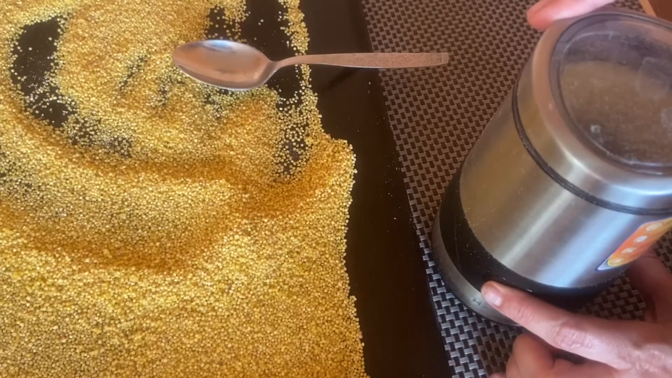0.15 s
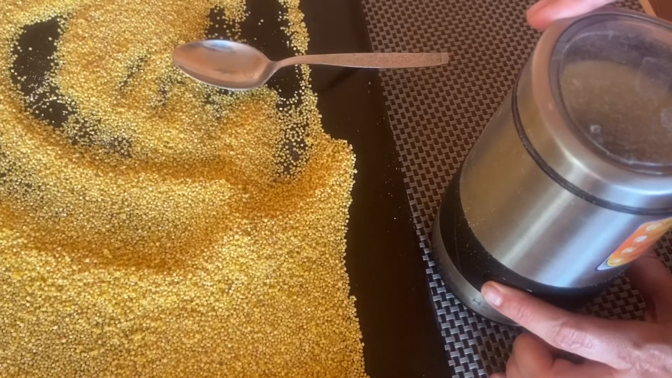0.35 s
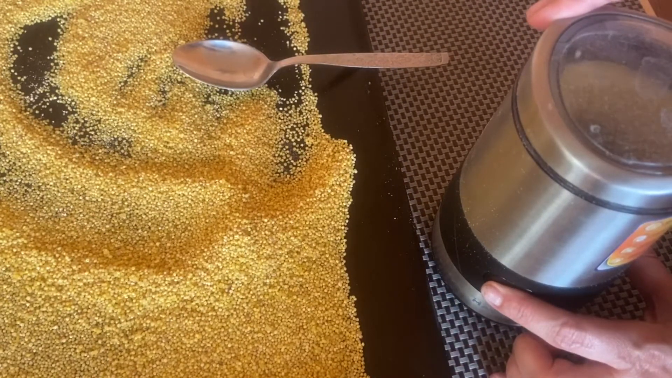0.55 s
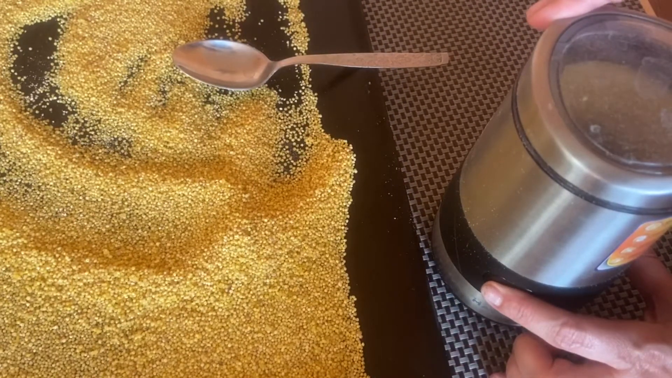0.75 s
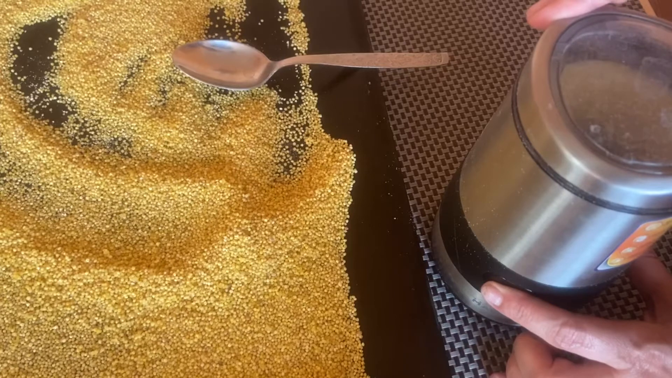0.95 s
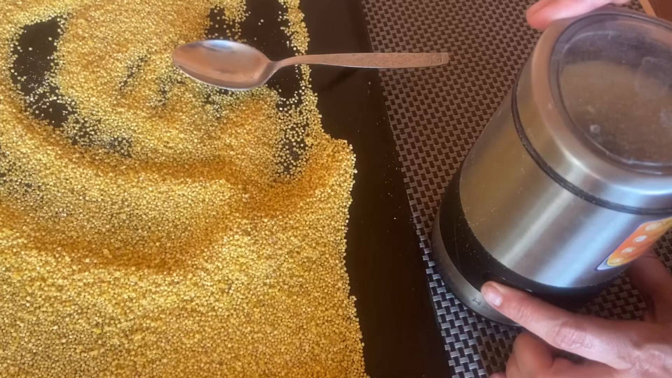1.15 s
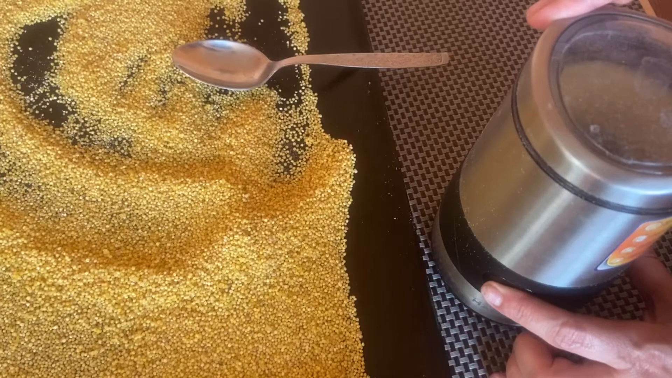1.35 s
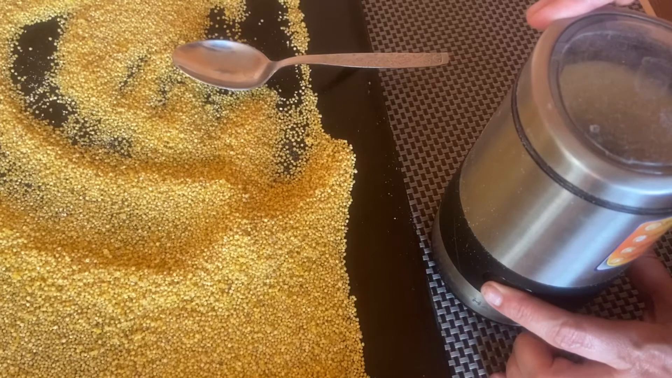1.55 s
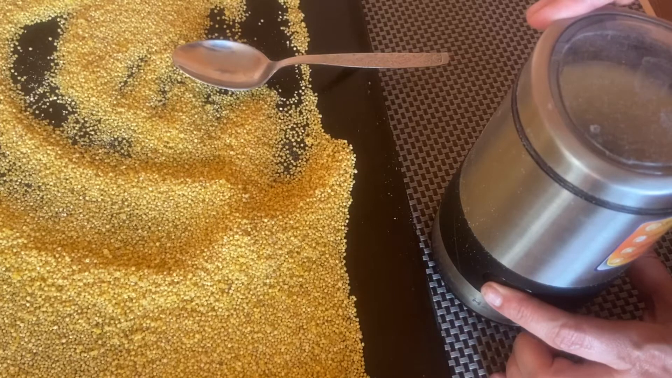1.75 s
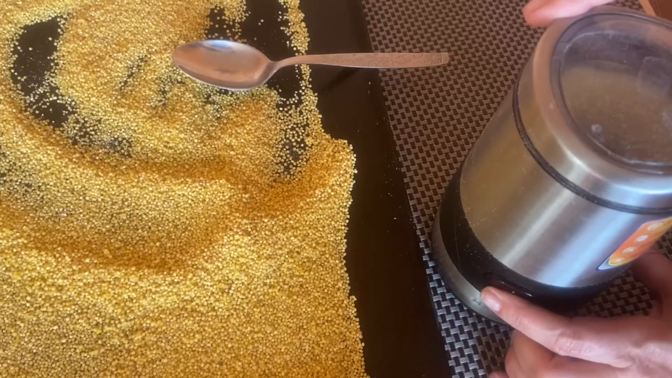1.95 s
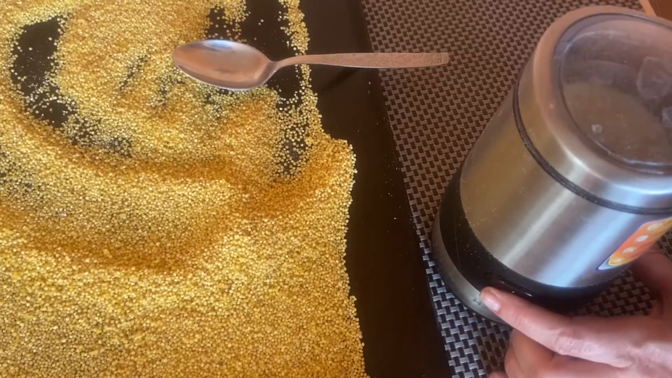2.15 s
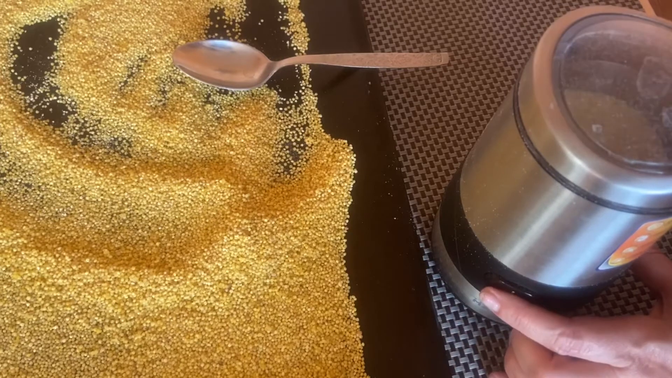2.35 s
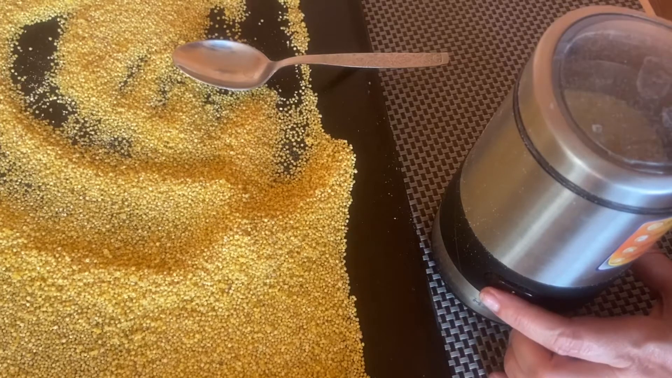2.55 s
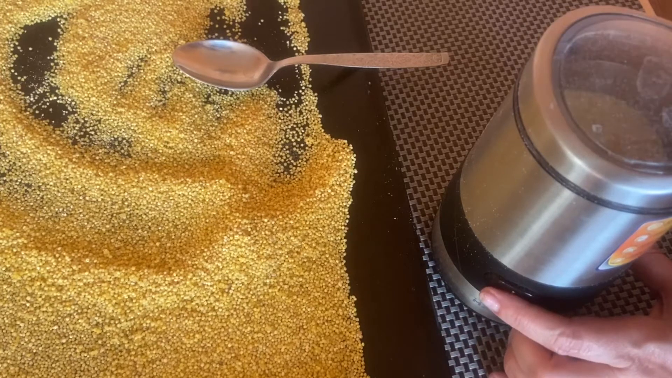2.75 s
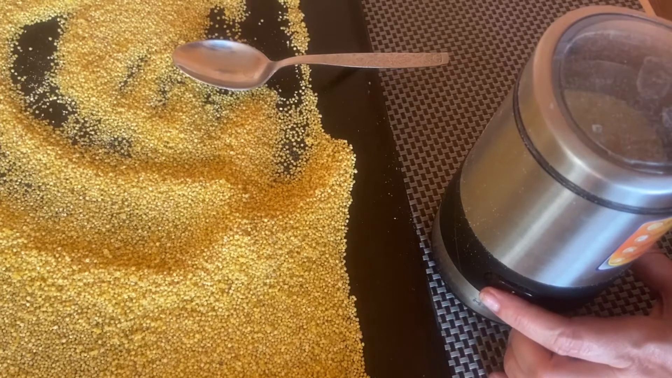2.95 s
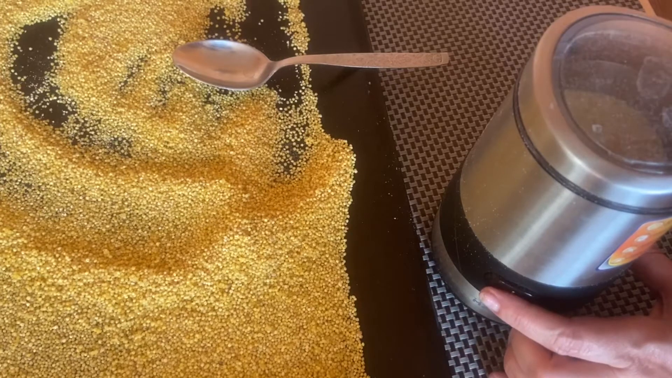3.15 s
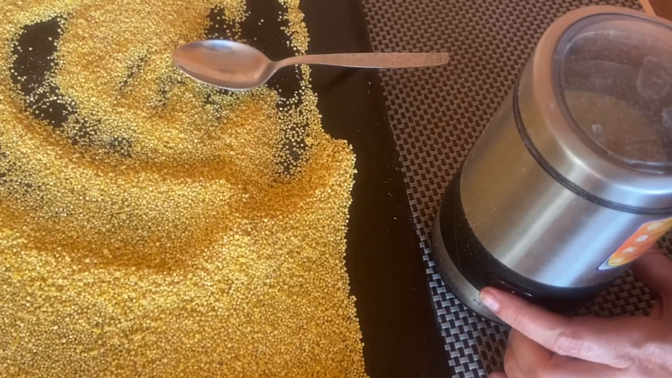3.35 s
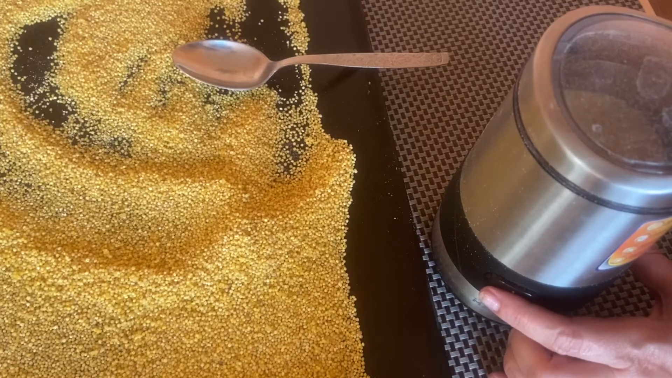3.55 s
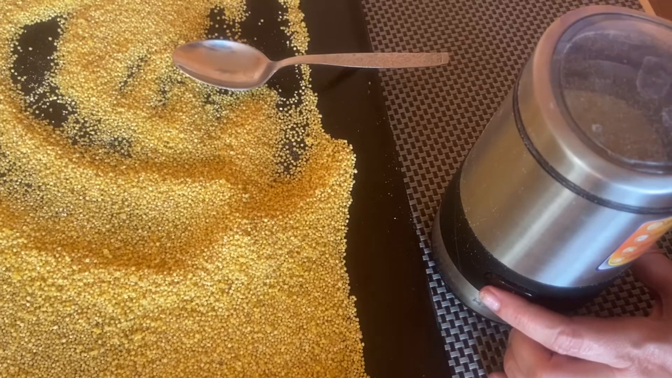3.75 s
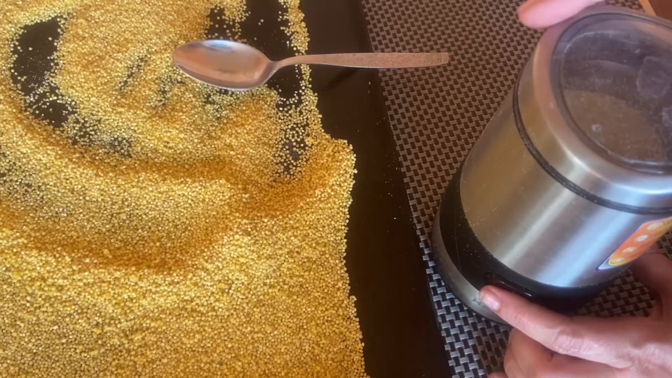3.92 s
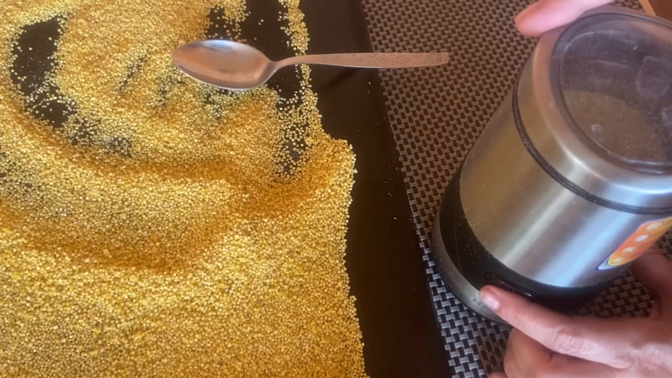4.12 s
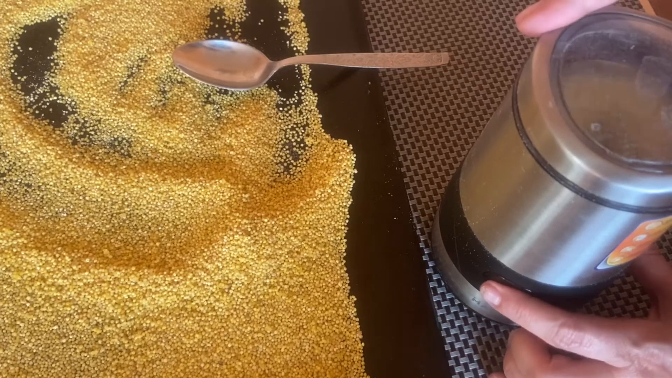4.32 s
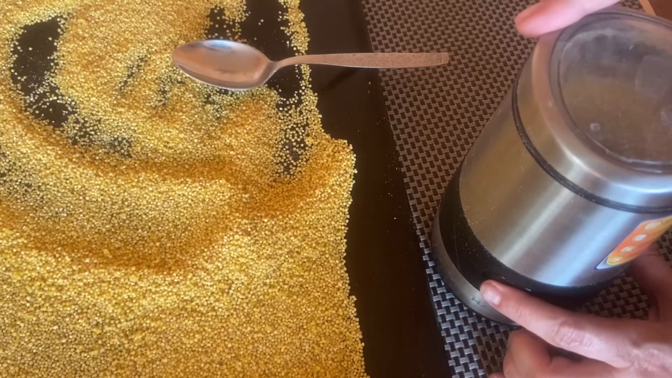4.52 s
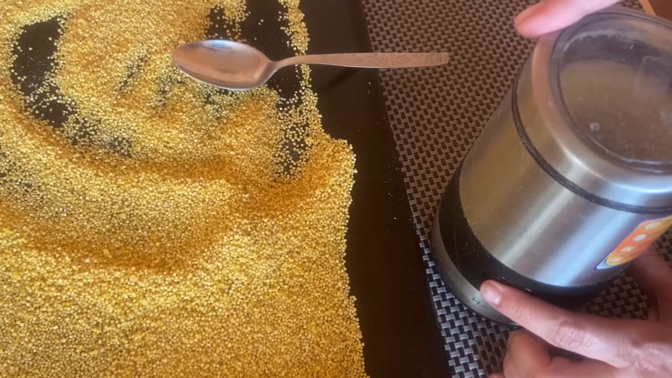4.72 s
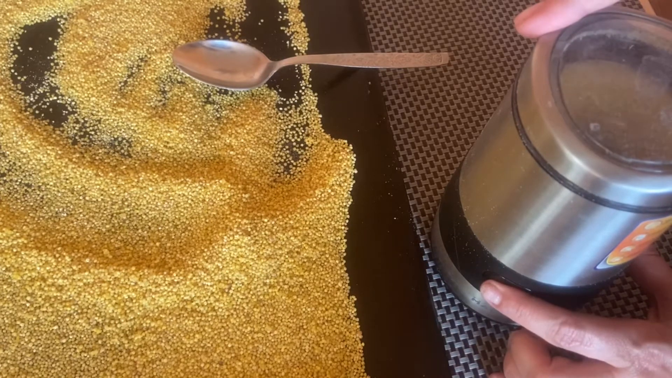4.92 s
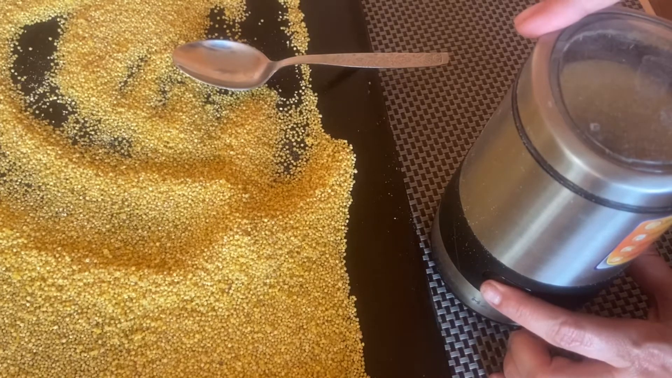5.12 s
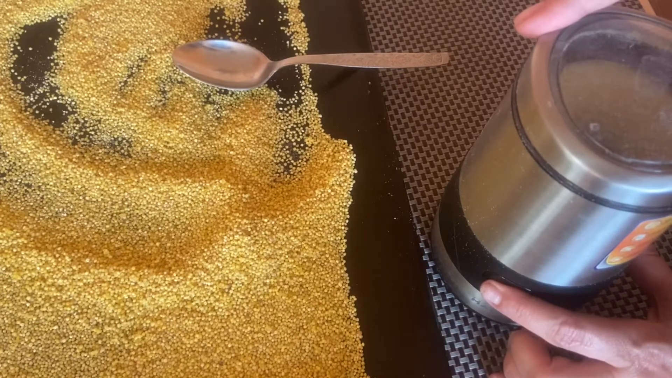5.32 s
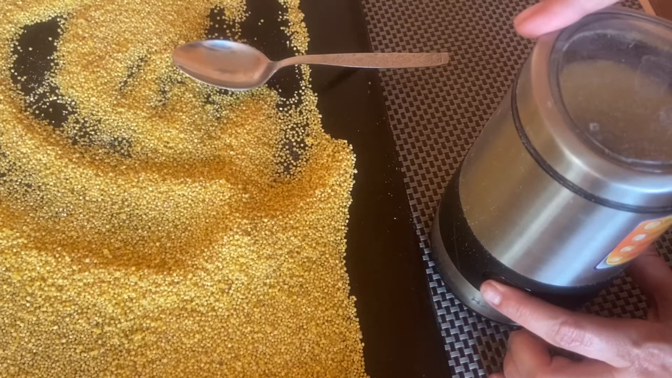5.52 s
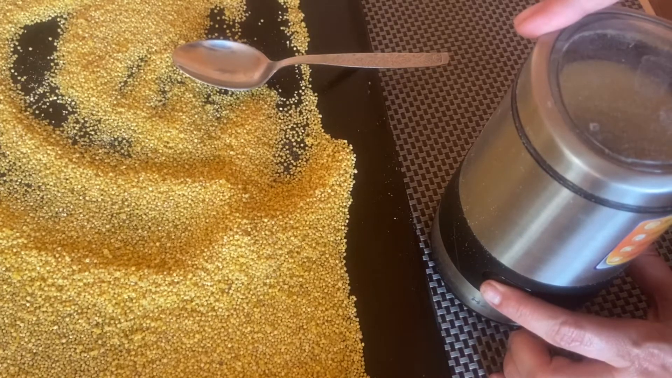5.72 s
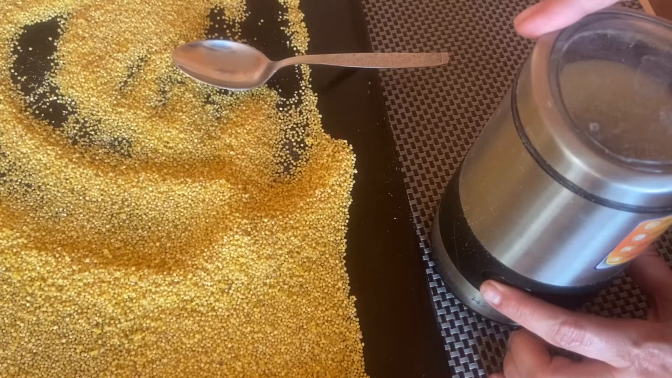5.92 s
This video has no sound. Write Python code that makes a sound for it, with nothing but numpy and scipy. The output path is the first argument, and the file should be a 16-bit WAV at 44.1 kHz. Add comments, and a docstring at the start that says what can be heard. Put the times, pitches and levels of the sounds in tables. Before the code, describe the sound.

An electric blade grinder roars with rattling grain, winds down to a quiet kitchen hum, then clicks and bursts back to full speed.

```python
"""Blade grinder on a kitchen table

An electric grinder coasts to a stop, rests about two seconds and starts again.
The shaft hums by sines that follow its speed; kernels patter as random hits through resonances of cup and lid.
The kitchen rings on after the blade stops, by sparse echo taps that die band by band.
In the pause: filtered noise as the low drone of the room, a finger on the button as struck modes,
and a faint thin whistle."""
import sys
import numpy as np
from scipy import signal
from scipy.fft import rfft, irfft, next_fast_len
from scipy.io import wavfile
from scipy.ndimage import uniform_filter1d

SR = 44100
rng = np.random.default_rng(int(sys.argv[2]) if len(sys.argv) > 2 else 0)


def waveform_to_disk(signal):
    """Save audio, clipped to [-1, 1], as 16-bit WAV at the path in sys.argv[1]."""
    frames = np.transpose(np.atleast_2d(signal))
    scaled = np.clip(frames, -1, 1) * 32767
    samples = np.round(scaled).astype(np.int16)
    wavfile.write(sys.argv[1], SR, samples)


def convert_level_to_amplitude(level_db):
    """Map a level in decibels to its linear amplitude factor."""
    exponent = np.asarray(level_db, float) / 20
    return 10 ** exponent


N = 263444
FULL_SPEED_HZ = 244  # reference shaft speed, turns per s


def evened(x):
    """Scales to rms 1."""
    return x / np.sqrt(np.mean(x ** 2) + 1e-20)


def read(points, hz):
    """Reads a table on a log-frequency axis."""
    f, value = np.transpose(points)
    return np.interp(np.log(hz + 1), np.log(f + 1), value)


def curve(tables, column, rest):
    """Joins one column of the bursts along the whole time, with a resting value between them."""
    t = np.arange(N) / SR
    out = np.full(N, float(rest))
    for rows in tables:
        rows = np.array(rows)
        inside = (t >= rows[0, 0]) & (t <= rows[-1, 0])
        out[inside] = np.interp(t[inside], rows[:, 0], rows[:, column])
    return out


def coloured(x, gain):
    """Filters by a function of frequency."""
    size = next_fast_len(N)
    spectrum = rfft(x, size) * gain(np.fft.rfftfreq(size, 1 / SR))
    return irfft(spectrum, size)[..., :N]


def ring(x, hz, width_hz):
    """A two-pole resonance of gain 1 at its centre."""
    return signal.lfilter(*signal.iirpeak(hz, hz / width_hz, SR), x)


def paired(shared, own, likeness):
    """Left port is the shared part; right mixes it with a part of its own, by likeness per frequency."""
    same = lambda hz: np.clip(read(likeness, hz), 0, 1)
    right = coloured(shared, same) + coloured(own, lambda hz: np.sqrt(1 - same(hz) ** 2))
    return np.array([shared, right])


def drift(cutoff_hz, shape):
    """Random wander: low-passed noise of rms 1."""
    return evened(signal.lfilter(*signal.butter(1, cutoff_hz, fs=SR), rng.standard_normal(shape)))


def kernels(per_s, spread_db):
    """Two trains of random hits at the same moments; a wider spread makes a few of them large."""
    hits = rng.random(N) < per_s / SR
    size = convert_level_to_amplitude(spread_db * np.minimum(rng.exponential(1, N), 5)) * hits
    return evened(size * rng.standard_normal((2, N)))


# Presses of the button. Each row: power on in seconds, power off in seconds, top speed in turns per s.
BURSTS = [(-.6, 1.812, 244.4), (4.33, 7, 245)]
# Shaft hum at top speed. Each entry: one burst's rms in dB, before drift, speed and port gains.
HUM_TOP_DB = [-31, -29.5]


def motor():
    """Shaft speed (turns per s), seconds since power off, hum level (dB); fast then slow rise, linear coast."""
    quick_share, quick_s, settle_s = .76, .088, .19  # the slow rest of the rise works against the load
    coast_hz_per_s = 730
    t = np.arange(N) / SR
    row = np.searchsorted([on for on, _, _ in BURSTS], t) - 1
    on_s, off_s, top_hz = np.transpose(BURSTS)[:, row]
    coast_s = np.maximum(t - off_s, 0)
    driven_s = np.minimum(t, off_s) - on_s
    quick = quick_share * np.tanh(driven_s / quick_s)
    slow = (1 - quick_share) * (1 - np.exp(-driven_s / settle_s))
    speed_hz = top_hz * (quick + slow) - coast_hz_per_s * coast_s
    return np.maximum(speed_hz, 0), coast_s, np.array(HUM_TOP_DB)[row]


# Kernel patter, one table a burst. Each row: time in seconds, level in dB before the patter gain.
PATTER_LEVEL = [
    [(0, -19.5), (1.7, -22), (1.95, -23.5), (2.07, -28.5), (2.1, -41)],
    [(4.341, -32.5), (4.353, -24), (4.485, -23.5), (4.513, -18), (4.721, -20), (5.97, -19.5)],
]
# Modes of housing, cup and lid. Each row: Hz, width in Hz, relative level in dB.
CUP_MODES = [(491.4, 20, -8.5), (450, 40, -19.5), (637.4, 25, -16.5), (689.8, 19, -9.5), (1333, 63, -7.5),
             (1458, 25, -8.5), (1555, 50, -8.5), (1723, 63, -7.5), (1846, 120, -8), (1999, 56, -10),
             (2159, 42, -11), (2470, 250, -13.5), (3112, 110, -13.5), (3713, 290, -10.5), (4087, 100, -7.5),
             (4840, 210, -10), (5200, 750, -7.5), (6330, 510, -6.5), (6964, 280, -7.5), (7380, 300, -11),
             (8140, 200, 0), (10180, 97, -11), (10470, 620, -5), (11200, 530, -7)]
# Colour change of a slow blade under power. Each row: Hz, change in dB at standstill.
STRAINING = [(480, -10), (700, 9), (1330, 8), (1600, 5), (3000, 1), (10000, -5)]
# Colour change of a slow blade while coasting. Each row: Hz, change in dB at standstill.
COASTING = [(480, -10), (700, 6), (1330, 3), (3000, 4), (4100, -4), (10000, -3)]
# Lid buzzing while the blade coasts. Each row: Hz, width in Hz, relative level in dB before slowness.
LOOSE_LID = [(1030, 90, -5), (1235, 80, -5), (880, 100, -9)]
# Housing buzzing while the motor pulls up. Each row: Hz, width in Hz, relative level in dB before slowness.
STRAIN_BUZZ = [(690, 18, 5), (1335, 22, 4)]
# Flour hissing round the wall. Each row: Hz, relative density in dB per Hz.
FLOUR_HISS = [(25, -37.5), (60, -13.5), (150, -15), (350, -16.5), (570, -10), (1000, -9.5), (1600, -9),
              (2800, -8), (4400, -11.5), (5500, -9.5), (6500, -3), (8500, -3), (10200, -7.5), (11000, -4),
              (11800, -8.5)]
# Likeness of the grinder at the two microphone ports. Each row: Hz, likeness 0 to 1.
GRINDER_LIKENESS = [(100, 0.99), (300, 1), (400, 0), (490, 1), (650, .55), (1000, 0.4), (1400, 1),
                    (1800, .93), (2500, 1), (2750, 0.89), (3050, 0.3), (3600, 1), (4500, 1), (5150, 0.6),
                    (5700, 0), (6100, 0.96), (7300, 1), (8000, 0.5), (8450, 1), (9600, 0.96), (10100, 0.3),
                    (10700, 1)]


def patter():
    """Kernels ring each mode of the cup in lumps; flour hisses; a slow blade changes the colour."""
    gain_db = 2.5
    speed_hz, coast_s, _ = motor()
    slow = np.clip(1 - speed_hz / FULL_SPEED_HZ, 0, 1)
    coasting = coast_s > 0
    out = np.zeros((2, N))
    for hz, width_hz, db in CUP_MODES:
        lumps_db = 2.2 * drift(7.1, N)
        slow_db = slow * np.where(coasting, read(COASTING, hz), read(STRAINING, hz))
        out += convert_level_to_amplitude(db + lumps_db + slow_db) * evened(ring(kernels(per_s=2500, spread_db=3), hz, width_hz))
    for hz, width_hz, db in LOOSE_LID:
        buzz = evened(ring(kernels(per_s=2100, spread_db=4.5), hz, width_hz))
        out += convert_level_to_amplitude(db) * np.sqrt(slow) * coasting * buzz
    for hz, width_hz, db in STRAIN_BUZZ:
        buzz = evened(ring(kernels(per_s=3500, spread_db=4), hz, width_hz))
        out += convert_level_to_amplitude(db) * slow ** .8 * (coast_s == 0) * buzz
    hiss = evened(coloured(kernels(per_s=14000, spread_db=0.0), lambda hz: convert_level_to_amplitude(read(FLOUR_HISS, hz))))
    out += convert_level_to_amplitude(8.0 + 2.0 * drift(25, N) - 1.5 * slow) * hiss
    sweep = 1 + 0.027 * np.cos(2 * np.pi * np.cumsum(speed_hz) / SR)  # the load circles with the blade
    level = uniform_filter1d(convert_level_to_amplitude(curve(PATTER_LEVEL, column=1, rest=-140)), size=60)
    shared, own = convert_level_to_amplitude(gain_db) * level * sweep * evened(out)
    return paired(shared, own, GRINDER_LIKENESS)


# Large lumps striking the cup. Each row: time in seconds, peak in dB.
KNOCKS = [(0.4001, -11.5), (2.073, -15), (4.345, -19), (4.3791, -10.5), (4.4398, -16), (4.5252, -10.5),
          (4.6987, -15), (4.9484, -12.5)]


def knocks():
    """Each lump rings all modes of the cup at once, each by a chance amount."""
    rise_s = .0006
    t = np.arange(2500) / SR
    out = np.zeros(N)
    shares = rng.standard_normal((len(KNOCKS), len(CUP_MODES)))
    for (start_s, peak_db), share in zip(KNOCKS, shares):
        blow = np.zeros(len(t))
        for k, (hz, width_hz, mode_db) in zip(share, CUP_MODES):
            decay = np.exp(-np.pi * width_hz * t)
            blow += k * convert_level_to_amplitude(mode_db) * np.sqrt(width_hz) * decay * np.sin(2 * np.pi * hz * t)
        blow = blow * np.minimum(t / rise_s, 1)
        out[round(start_s * SR):][:len(t)] += convert_level_to_amplitude(peak_db) * blow / abs(blow).max()
    return out


# Brief dips of the blade-pass tone. Each row: time in seconds, depth in dB, recovery time constant in s.
DIPS = [(.293, 17, .025), (.648, 14, 0.058), (.978, 23, 0.036), (1.19, 16, 0.01), (1.316, 22, .04),
        (1.645, 13, 0.022), (4.56, 17, 0.019), (4.655, 26, 0.015), (5.413, 34, 0.0052)]


def dips():
    """Depth in dB: each dip deepens exponentially and recovers at its own pace."""
    fall_s = 0.0092
    t = np.arange(N) / SR
    return sum(db * np.exp(-abs(t - s) / np.where(t < s, fall_s, back_s)) for s, db, back_s in DIPS)


# Hum against speed. Each row: turns per s, change in dB.
HUM_BY_SPEED = [(50, -34), (130, -22), (170, -22), (195, -8), (214, 1), (244, 0)]
# Blade-pass tone against speed. Each row: turns per s, change in dB.
BLADE_BY_SPEED = [(150, -35), (210, -14), (222, -4), (233, -10), (238, 0)]
# Blade-pass tone, one table a burst. Each row: time in seconds, rms in dB before speed, dips and port gains.
BLADE_LEVEL = [
    [(0, -24.5), (.43, -28.5), (.62, -26), (.95, -25.5), (1.05, -26.5), (1.5, -28), (2.1, -27.5)],
    [(4.34, -32), (4.75, -30.5), (4.95, -22.5), (5.0, -28), (5.34, -24.5), (5.43, -25.5), (5.66, -32),
     (5.89, -25), (5.97, -31.5)],
]
# Table top shaken by the shaft. Each row: Hz, width in Hz, gain in dB before port gains.
TABLE_MODES = [(136, 3, -24), (198, 12, -32)]


def shaft():
    """Unbalance hums once a turn, the two blade tips twice; the table rings as the speed passes its modes."""
    coast_hum_db_per_s, coast_blade_db_per_s = 91, 303  # fades once the power is off
    port_db = np.array([[-2.2], [1.2]])
    speed_hz, coast_s, hum_db = motor()
    wander_hz = 1.2 + 25 * (1 - speed_hz / FULL_SPEED_HZ) * (coast_s == 0)
    turns = np.cumsum(speed_hz + wander_hz * drift(27, N)) / SR
    hum_db = hum_db + read(HUM_BY_SPEED, speed_hz) - coast_hum_db_per_s * coast_s + .8 * drift(3.1, N)
    blade_db = curve(BLADE_LEVEL, column=1, rest=-140) + read(BLADE_BY_SPEED, speed_hz)
    blade_db = blade_db - coast_blade_db_per_s * coast_s - dips()
    once = np.sqrt(2) * convert_level_to_amplitude(hum_db) * (speed_hz > 0) * np.sin(2 * np.pi * turns)
    twice = np.sqrt(2) * convert_level_to_amplitude(blade_db) * np.sin(4 * np.pi * turns + 1.2)
    shake = speed_hz / FULL_SPEED_HZ * np.sin(2 * np.pi * turns)
    table = sum(convert_level_to_amplitude(db) * ring(ring(shake, hz, width_hz), hz, 6 * width_hz)
                for hz, width_hz, db in TABLE_MODES)
    return (once + twice + table) * convert_level_to_amplitude(port_db)


def struck(events, modes, hiss_db, rise_s):
    """Every blow rings the same modes, a little differently each time, under a puff of noise."""
    hiss_decay_s = .0035
    t = np.arange(6000) / SR
    out = np.zeros(N)
    shares = rng.standard_normal((len(events), len(modes)))
    puffs = rng.standard_normal((len(events), len(t)))
    puffs = signal.lfilter([1], [1, -.8], puffs)  # softens the treble
    for (start_s, db), share, puff in zip(events, shares, puffs):
        blow = convert_level_to_amplitude(hiss_db) * puff * np.exp(-t / hiss_decay_s)
        for k, (hz, mode_db, t60_s) in zip(share, modes):
            blow += convert_level_to_amplitude(mode_db + 2 * k - 60 * t / t60_s) * np.sin(2 * np.pi * hz * t)
        out[round(start_s * SR):][:len(t)] += convert_level_to_amplitude(db) * np.minimum(t / rise_s, 1) * blow
    return out


# Finger on the button. Each row: time in seconds, gain in dB.
TICKS = [(3.822, -70), (3.84, -70), (3.857, -64), (4.278, -48), (4.3395, -30)]
# Plastic of the button. Each row: Hz, mean relative level in dB, t60 in s.
BUTTON_MODES = [(920, -4, 0.032), (1800, 1.5, 0.026), (2570, -3, .01), (5200, -1, .01), (6830, -7, .01)]
# Base jolting on the table. Each row: time in seconds, gain in dB.
JOLTS = [(4.281, -53), (4.303, -47.5), (4.348, -25), (4.364, -28)]
# Base of the grinder. Each row: Hz, mean relative level in dB, t60 in s.
BASE_MODES = [(62, -17, .3), (112, -9, .3), (345, 0, .1), (505, -6, .08), (600, -1, .1)]


def button():
    """Short plastic ticks, and the thuds of the base as the finger presses and the motor kicks."""
    ticks = struck(TICKS, BUTTON_MODES, hiss_db=-15, rise_s=.001)
    thuds = struck(JOLTS, BASE_MODES, hiss_db=-40, rise_s=.004)
    return ticks + thuds


# Whistle. The one row: start in seconds, length in seconds, mean Hz, mean level in dB at the top of its swell.
WHISTLE = (3.9, .125, 3705, -74.5)


def whistle():
    """A faint sine, made fuzzy by wandering pitch and level, that swells and stops."""
    start_s, length_s, hz, db = WHISTLE
    arch = np.sin(np.pi * np.clip((np.arange(N) / SR - start_s) / length_s, 0, 1) ** 1.4)
    swell = np.sqrt(abs(arch)) * (arch > 1e-6)
    level = convert_level_to_amplitude(db + 3.5 * drift(60, N))
    cycles = np.cumsum(hz + 110 * drift(150, N)) / SR
    return swell * level * np.sin(2 * np.pi * cycles)


# Decay of the kitchen. Each row: Hz, t60 in s.
KITCHEN_T60 = [(200, 0.45), (1000, 0.62), (4000, 0.51), (8000, 0.4), (12000, 0.36)]
# Likeness of diffuse sound at the ports. Each row: Hz, likeness 0 to 1.
ROOM_LIKENESS = [(30, 1), (100, .95), (270, 0.9), (550, 0.3), (3000, 0.3), (4100, 0.2), (5500, 0.14),
                 (6500, 0.96), (7300, 1), (8100, .6), (8450, 1), (9600, 1), (10000, .5), (10800, 1)]


def kitchen(x):
    """Sparse taps of random sign, each band dying at its own speed."""
    taps = np.zeros((2, SR))
    at = np.arange(400, SR - 20, 20) + rng.integers(0, 20, (2, (SR - 401) // 20))
    np.put_along_axis(taps, at, rng.choice([-1., 1.], at.shape), 1)
    hz, t, bands = signal.stft(taps, SR, nperseg=256)
    decay = convert_level_to_amplitude(-60 * t / read(KITCHEN_T60, hz)[:, None])
    tail = signal.istft(bands * decay, SR, nperseg=256)[1]
    shared, own = signal.fftconvolve(x[None], tail / np.linalg.norm(tail[0]), axes=1)[:, :N]
    return paired(shared, own, ROOM_LIKENESS)


# Room drone. Each row: Hz, relative density in dB per Hz.
DRONE = [(20, -12), (50, -5), (90, -10), (165, -11), (230, -16), (345, -20), (560, -25), (750, -32),
         (1300, -40), (4500, -46.5), (11800, -57)]
# Wavering tones in the room. Each row: Hz, width in Hz, mean level in dB.
DRONE_LINES = [(200.2, 24, -59.5), (599, 9, -75.5), (340, 39, -74.5)]


def room_tone():
    """A low steady drone of filtered noise with a few wavering tones."""
    drone_db = -56
    noise = rng.standard_normal((2, N))
    out = convert_level_to_amplitude(drone_db) * evened(coloured(noise, lambda hz: convert_level_to_amplitude(read(DRONE, hz))))
    for hz, width_hz, db in DRONE_LINES:
        tone = evened(ring(ring(noise, hz, width_hz), hz, width_hz))
        out += convert_level_to_amplitude(db + 2.57 * drift(4.2, N)) * tone
    shared, own = out
    return paired(shared, own, ROOM_LIKENESS)


def scene():
    """Grinder and button close by, their echo in the kitchen, the whistle, the room tone."""
    hum_send_db, kitchen_db = -7.5, -9.0
    rattle = patter() + knocks() + button()
    hum = shaft()
    sent = rattle[0] + convert_level_to_amplitude(hum_send_db) * hum[0]  # the hum is loud only near the table
    return rattle + hum + convert_level_to_amplitude(kitchen_db) * kitchen(sent) + whistle() + room_tone()


def roll_off(x):
    """The treble ends steeply here."""
    return signal.sosfilt(signal.butter(12, 12930, fs=SR, output="sos"), x)


# Phase by which the left port leads the right. Each row: Hz, lead in radians.
PORT_LEAD = [(1250, 0), (1460, -1.1), (1750, 0), (4800, 0), (5200, 2.2), (5750, 2.2), (5950, 0), (7500, 0),
             (8000, -np.pi / 2), (8430, -np.pi), (9600, -np.pi), (10100, -1.5 * np.pi), (10700, -2 * np.pi)]


def record(dry):
    """The two ports hear some bands with a phase between them; the band ends sharply."""
    edge_hz, edge_width_hz = 11880, 150

    def ports(hz):
        phase = np.exp(.5j * np.outer([1, -1], read(PORT_LEAD, hz)))
        return phase * np.clip((edge_hz - hz) / edge_width_hz + .5, 0, 1)

    mix = coloured(dry, ports)
    return roll_off(mix)


dry = scene()
out = record(dry)
waveform_to_disk(out)
```